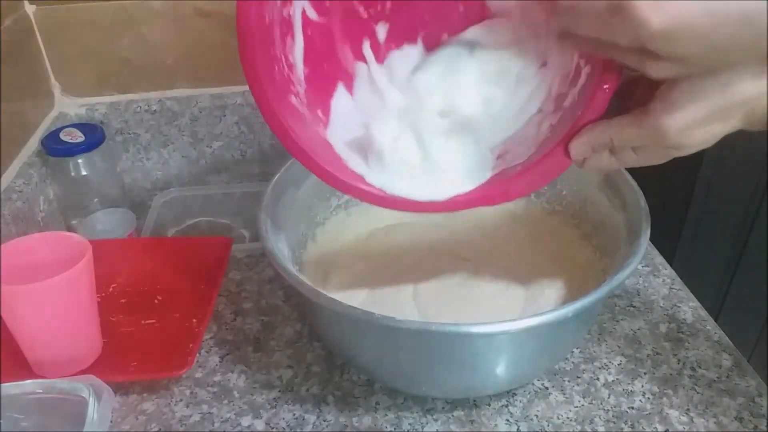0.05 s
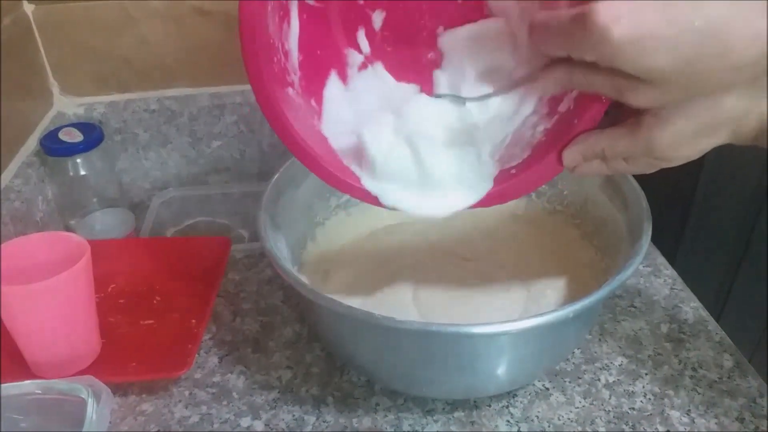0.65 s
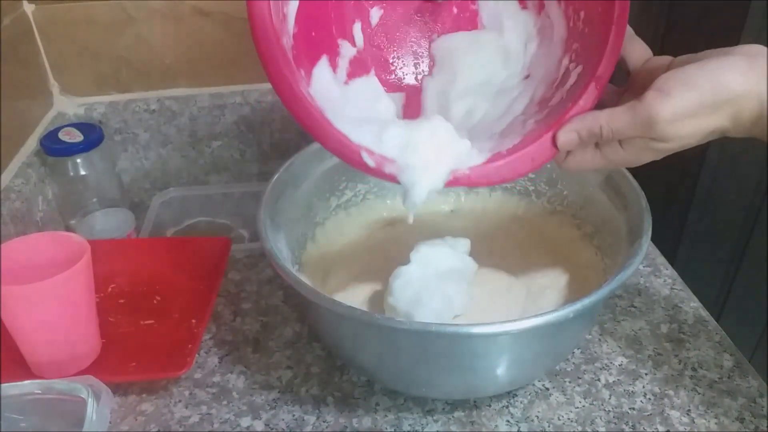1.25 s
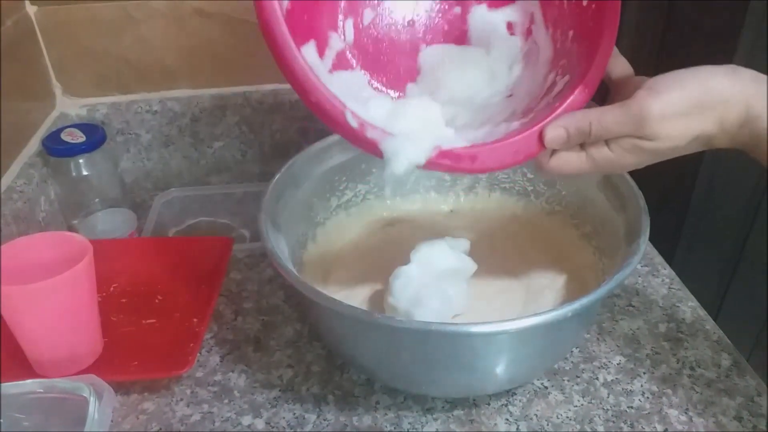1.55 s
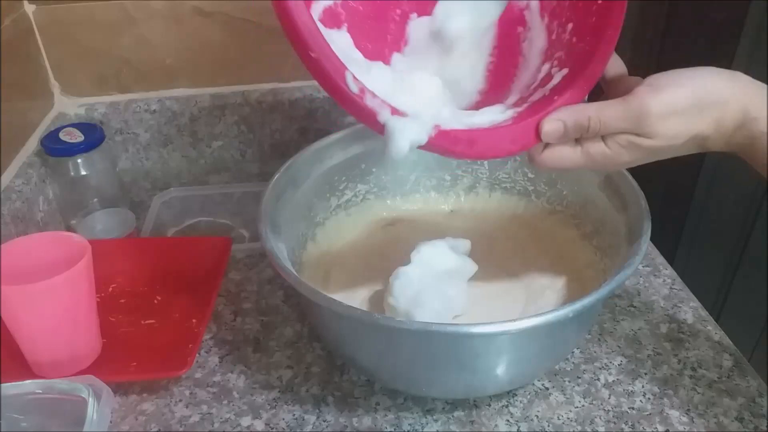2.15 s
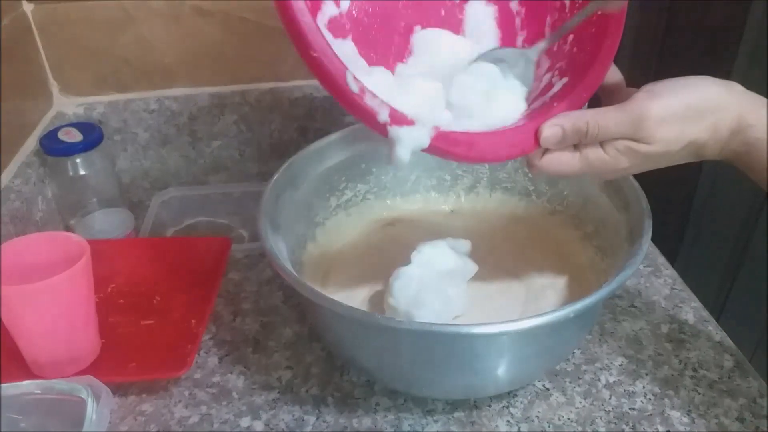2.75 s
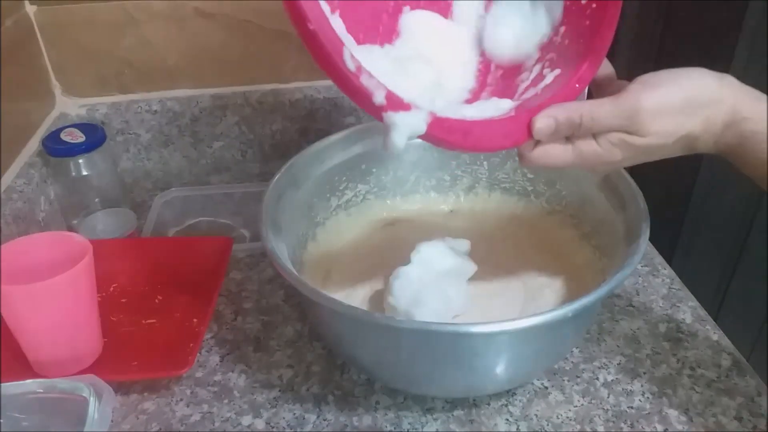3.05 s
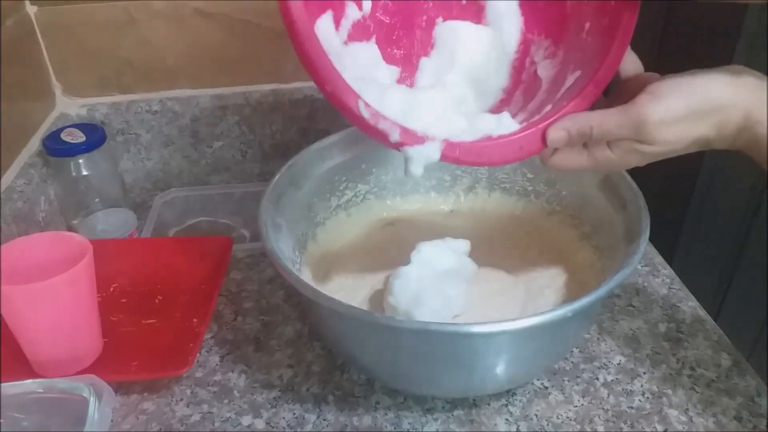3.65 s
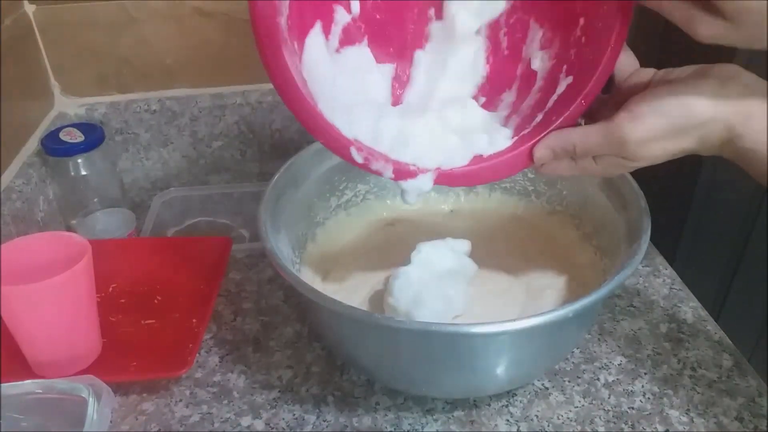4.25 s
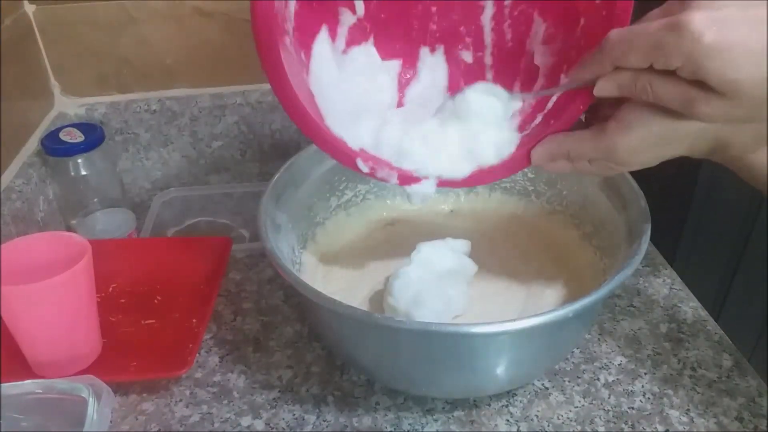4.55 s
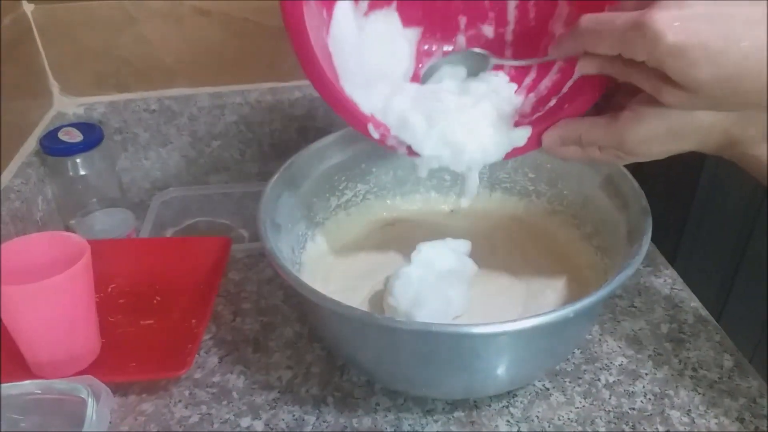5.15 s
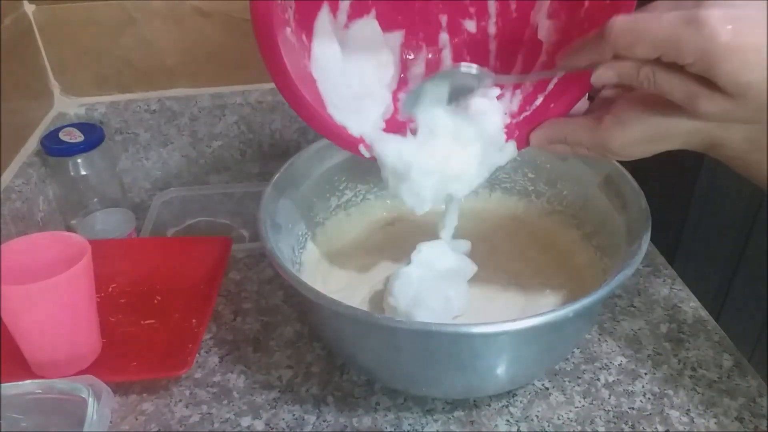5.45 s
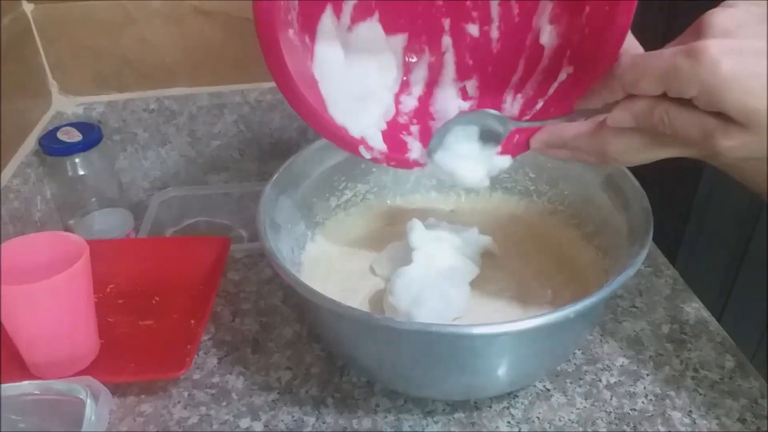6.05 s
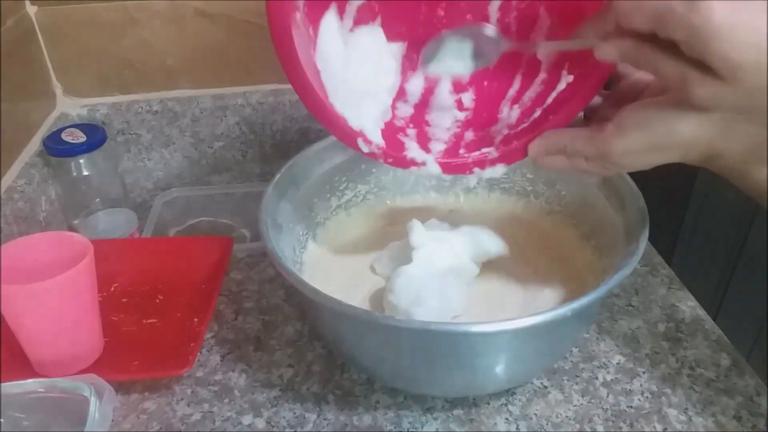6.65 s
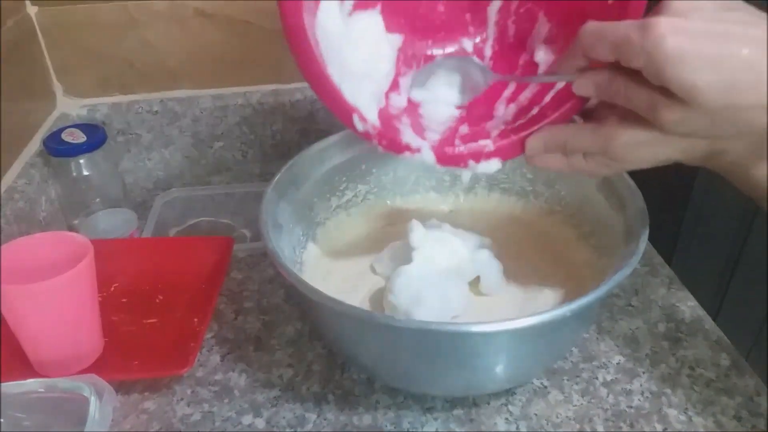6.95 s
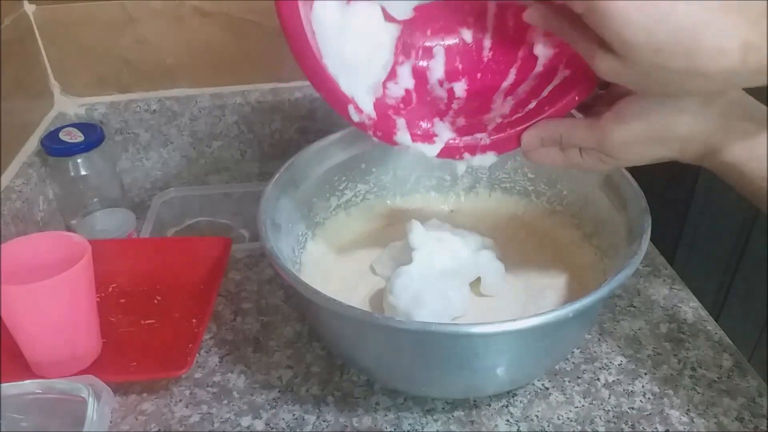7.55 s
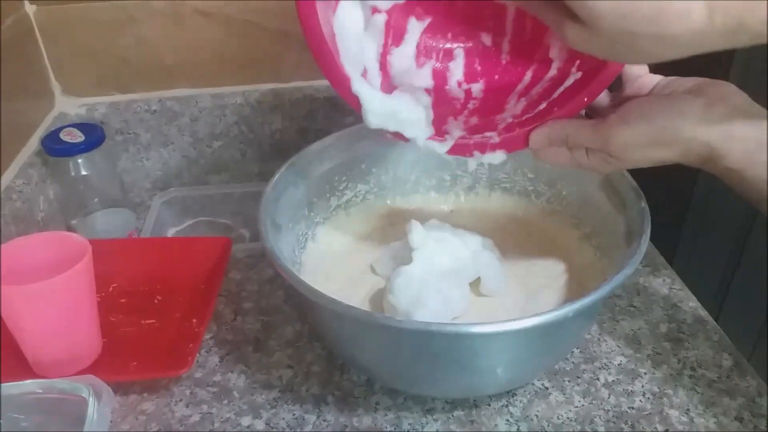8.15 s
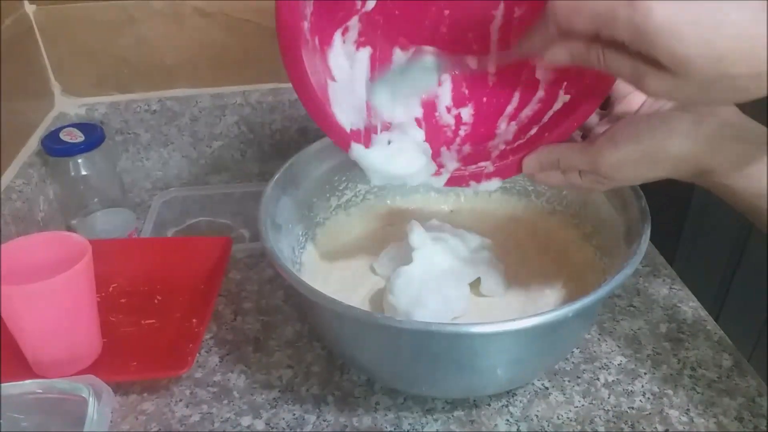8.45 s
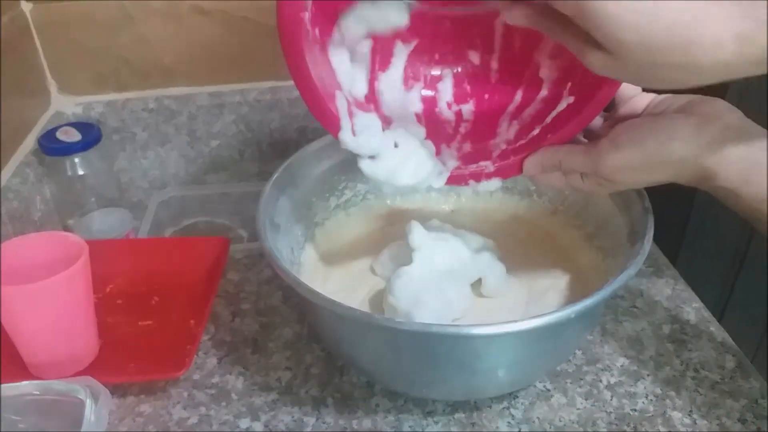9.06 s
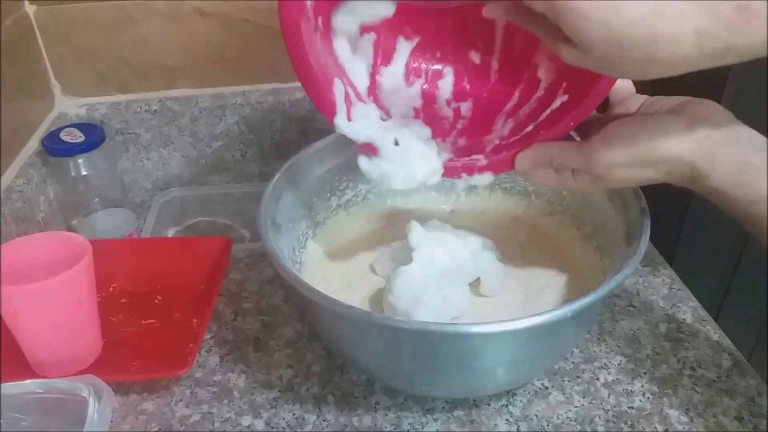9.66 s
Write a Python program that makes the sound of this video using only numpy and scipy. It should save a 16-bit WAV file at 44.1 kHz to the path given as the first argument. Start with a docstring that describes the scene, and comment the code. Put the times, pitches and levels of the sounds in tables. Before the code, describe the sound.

A steel spoon scoops whipped egg white from a plastic bowl, close to the microphone in a small tiled kitchen. Each stroke opens with a hollow, briefly ringing knock, followed by a short, softer scrape of fizzing, squelching foam and rubbed plastic. Knocks come right at the start and at about 0.5, 1.3, 2.4, 3.0, 3.7, 4.3, 5.0 and 5.7 seconds, the strongest at 0.5 and 4.3. The wet scraping swells around 4.4 and 5.1 seconds, where the edge catches with a sharp tick. More knocks land near 6.5, 6.8, 7.6, 8.1, 8.7, 9.1 and 9.6 seconds, with clusters of scratchy ticks and firmer rubbing between 7.6 and 8.4. Now and then the sliding spoon gives a very faint, thin, high ring. Quiet room air and a faint appliance hum continue underneath throughout.

```python
"""A small tiled kitchen, one microphone close to a plastic bowl held over a basin of batter.
A steel spoon scoops out whipped egg white. Each stroke starts with a knock that rings the bowl's
wall; then the spoon slides through the fizzing, squelching foam, rubbing and catching on the
plastic and now and then singing faintly. Behind it are room air and an appliance's faint hum."""
import sys
import numpy as np
from scipy import signal
from scipy.fft import rfft, irfft
from scipy.io import wavfile
from scipy.ndimage import uniform_filter1d

SR = 44100
rng = np.random.default_rng(int(sys.argv[2]) if len(sys.argv) > 2 else 0)


def store_pcm(level_fs):
    """Save levels as 16-bit WAV."""
    pcm = np.round(np.clip(level_fs, -1, 1) * 32767).astype(np.int16)
    wavfile.write(sys.argv[1], SR, np.atleast_2d(pcm).T)


N = 436149
TIME = np.arange(N) / SR


def from_db(db):
    """Decibels to gain."""
    return 10 ** (np.asarray(db) / 20)


def unit_rms(x):
    """Scale to rms 1."""
    return x / np.sqrt(np.mean(x ** 2) + 1e-20)


def at_hz(points, hz):
    """Read a table on a log-frequency axis."""
    table_hz, value = np.transpose(points)
    return np.interp(np.log(np.maximum(hz, 1)), np.log(table_hz), value)


def bump(hz, centre_hz, octaves):
    """Bell curve of height 1 on a log-frequency axis."""
    return np.exp(-.5 * (np.log2(hz / centre_hz) / octaves) ** 2)


def decay(t, t60):
    """Envelope that falls 60 dB in t60 seconds."""
    return np.exp(-np.log(1000) * t / t60)


def add(track, start_s, sound):
    """Mix a sound into the track at a time."""
    start = max(round(start_s * SR), 0)
    track[start:start + len(sound)] += sound[:N - start]


def band(x, low_hz, high_hz, order=2):
    """Butterworth band-pass."""
    sos = signal.butter(order, [low_hz, min(high_hz, .45 * SR)], "band", fs=SR, output="sos")
    return signal.sosfilt(sos, x)


def colour(x, spectrum):
    """Give a steady sound a spectrum; rms 1."""
    gain = from_db(at_hz(spectrum, np.fft.rfftfreq(len(x), 1 / SR)))
    return unit_rms(irfft(rfft(x) * gain, len(x)))


def flutter(length, depth_db, low_hz, high_hz):
    """A gain that wanders at random, at rates between low_hz and high_hz."""
    return from_db(depth_db * unit_rms(band(rng.standard_normal(length), low_hz, high_hz)))


def ring(x, modes):
    """Drive decaying modes, each given as (Hz, dB, t60 in seconds); rms 1."""
    out = 0
    for k, (hz, db, t60) in enumerate(modes):
        radius, angle = from_db(-60 / (t60 * SR)), 2 * np.pi * hz / SR
        mode = signal.lfilter([0, np.sin(angle)], [1, -2 * radius * np.cos(angle), radius ** 2], x)
        out = out + (-1) ** k * from_db(db) * mode
    return unit_rms(out)


# The still kitchen, all around the microphone. Each row: frequency in Hz, relative density in dB.
ROOM_AIR = [(30, -30.5), (55, 1.5), (100, 0.5), (160, -8), (350, -8.5), (550, -10), (900, -15.5),
            (1400, -9.5), (2000, -22), (3800, -25.5), (6000, -22), (10000, -22.5), (13000, -28.5),
            (16000, -30.5)]
# An appliance in the background. Each row: frequency in Hz, rms level in dB.
HUM_TONES = [(97, -72), (328, -88.5), (533, -82.5), (1410, -80)]

def room_tone(air_db=-66.0, waver=0.11):
    """Room air and an appliance's slightly wavering hum."""
    out = from_db(air_db) * colour(rng.standard_normal(N), ROOM_AIR)
    for hz, db in HUM_TONES:
        drift = np.interp(TIME, np.linspace(0, TIME[-1], num=60), rng.standard_normal(60))
        tone = np.sqrt(2) * np.sin(2 * np.pi * hz * TIME + drift)
        out += from_db(db) * (1 + waver * drift) * tone
    return out


# The bowl's thin wall under hard contact. Each row: frequency in Hz, relative density in dB.
WALL_SPECTRUM = [(100, -4.5), (200, -1.5), (600, 11), (800, -6), (1150, 3.5), (1500, -2.5), (2000, 2.5),
                 (2500, -5), (4000, -7.5), (5200, -9), (7500, -10), (10000, -15.5), (12500, -23),
                 (16000, -32)]
# The steel spoon's own ring. Each row: frequency in Hz, relative level in dB, t60 in seconds.
SPOON_MODES = [(4000, 2, 0.13), (3720, -3.5, 0.22), (5590, 6, 0.033), (6220, 4.5, 0.14), (6484, 2, 0.04),
               (8700, 6, 0.078), (9900, 1.5, 0.065), (9900, 0, 0.28), (15000, -11, 0.057)]

def wall_and_spoon(count=110, spread_db=14.5, wall_t60=0.085):
    """Bright answer of the spoon and the wall's many uneven upper modes to one click; energy 1."""
    wall_hz = np.geomspace(900, 12000, count) * (1 + .008 * rng.standard_normal(count))
    wall_db = at_hz(WALL_SPECTRUM, wall_hz) + 10 * np.log10(wall_hz / wall_hz[0])
    wall_db += spread_db * rng.uniform(-1, 1, count)
    ring_times = wall_t60 * rng.uniform(.8, 1.4, count)
    t = np.arange(SR * 3 // 5) / SR
    out = 0
    for hz, db, t60 in [*zip(wall_hz, wall_db, ring_times), *SPOON_MODES]:
        out = out + from_db(db) * np.sin(2 * np.pi * (hz * t + rng.random())) * decay(t, t60)
    return out / np.linalg.norm(out)


# Strokes through the foam, close to the microphone, each slowing as it goes.
# Each row: start in seconds, length in seconds, relative foam hiss in dB, relative rub in dB.
STROKE_EVENTS = [(0.0, .18, -39.5, -37.5), (0.515, 0.24, -53, -42.5), (1.312, .17, -56, -51.5),
                 (1.615, .14, -61.5, -56.5), (1.813, 0.22, -52, -49), (2.395, 0.38, -48.5, -49.5),
                 (3.04, 0.35, -55, -52), (3.763, .28, -45.5, -49.5), (4.314, .34, -44.5, -44.5),
                 (5.009, 0.385, -49, -44.5), (5.728, 0.36, -55.5, -50), (6.805, 0.415, -45.5, -41),
                 (7.594, 0.29, -44, -42.5), (8.1, 0.31, -49.5, -44.5), (8.683, 0.17, -53, -53),
                 (9.176, 0.23, -50, -49.5), (9.733, .17, -56, -54)]
# The spoon bears down and tears off a lump.
# Each row: peak time in seconds, rise in seconds, relative foam hiss in dB, relative rub in dB.
PUSH_EVENTS = [(0.14, 0.044, -42, -55), (0.597, 0.021, -40.5, -36), (0.795, 0.034, -51.5, -42.5),
               (1.325, 0.029, -69, -35), (1.415, 0.016, -49.5, -40.5), (1.455, 0.034, -51, -54),
               (1.711, 0.034, -42.5, -43), (1.93, 0.038, -49, -56.5), (2.44, 0.018, -60, -36),
               (2.615, 0.023, -47, -58), (2.771, 0.015, -51.5, -62), (3.08, 0.02, -52.5, -68),
               (3.235, .015, -52, -72), (3.8, 0.02, -48, -56), (3.908, 0.02, -40.5, -44.5),
               (4.023, 0.031, -46, -48.5), (4.355, 0.022, -39.5, -34), (4.423, 0.022, -31.5, -34.5),
               (5.086, 0.019, -34, -34.5), (5.14, 0.04, -42, -41.5), (5.247, 0.017, -57.5, -38.5),
               (5.764, 0.06, -45, -37.5), (5.995, 0.029, -47.5, -54), (6.87, 0.048, -40.5, -40),
               (7.62, 0.017, -54.5, -44), (7.695, 0.014, -42, -37), (8.121, 0.023, -34.5, -30.5),
               (8.402, .012, -37.5, -57), (8.715, 0.02, -65, -40.5), (9.31, 0.027, -56, -47.5),
               (9.783, 0.019, -49.5, -44)]

def spoon_pressure(edge_s=0.0083, fade_db_per_s=31.5, fall_over_rise=.85):
    """Gains of hiss and rub: every stroke sets in, fades and lifts off; pushes swell on top."""
    power = np.zeros((2, N))
    t = np.arange(SR) / SR
    for start, length, *levels in STROKE_EVENTS:
        attack = np.minimum(t / edge_s, 1)
        release = np.exp(-np.maximum(t - length, 0) / edge_s)
        stroke = attack * from_db(-fade_db_per_s * t) * release
        for track, db in zip(power, levels):
            add(track, start, (from_db(db) * stroke) ** 2)
    for peak, rise, *levels in PUSH_EVENTS:
        start = max(peak - .5, 0)
        past_peak = (start + t - peak) / rise
        push = np.exp(-np.where(past_peak < 0, past_peak ** 2, past_peak / fall_over_rise))
        for track, db in zip(power, levels):
            add(track, start, (from_db(db) * push) ** 2)
    return np.sqrt(power)


def slips(per_s, spread_db):
    """Random tiny clicks of uneven size; rms 1."""
    sizes = from_db(spread_db * np.minimum(rng.exponential(1, N), 4)) * rng.choice([-1, 1], N)
    return unit_rms(sizes * (rng.random(N) < per_s / SR))


# Tearing egg white, heard close up. Each row: frequency in Hz, relative density in dB.
FOAM_SPECTRUM = [(900, -33.5), (1700, -2), (2500, -0.5), (3800, 2), (5000, -2), (7000, -1.5), (10000, -7.5),
                 (12500, -14.5), (16000, -23.5)]

def foam_hiss(stick_slip, bright_ring, ring_db=-7.5):
    """Foam tears in a fine fizz that also rings wall and spoon."""
    fizz = colour(slips(per_s=12000, spread_db=-2.0) * stick_slip, FOAM_SPECTRUM)
    return fizz + from_db(ring_db) * unit_rms(signal.fftconvolve(fizz, bright_ring)[:N])


# Steel rubbing on plastic. Each row: frequency in Hz, relative density in dB.
RUB_SPECTRUM = [(100, -23), (200, -3.5), (450, 11.5), (640, 11), (800, -6.5), (1250, 0), (2000, -8),
                (2800, -17), (5000, -33.5)]
# The bowl and the air in it. Each row: frequency in Hz, relative level in dB, t60 in seconds.
BOWL_MODES = [(156, -12.5, 0.11), (184.8, 6, 0.096), (205, -6, 0.053), (266, 5.5, 0.46), (297.5, 3.5, 0.28),
              (321, -5, 0.25), (359.7, 4, 0.45), (406.6, -7.5, 0.33), (441, 9.5, 0.354), (452.5, 9.5, 0.19),
              (485.4, 0, 0.19), (510.6, -4, 0.36), (498, -3.5, .18), (556.6, 8, 0.32), (580, -0.5, 0.58),
              (629, 18, 0.11), (620, 6, 0.47), (720, -18.5, 0.28), (735, -17, 0.2), (808, 1, 0.42),
              (1027, -0.5, 0.05), (1050, -2, 0.053), (1192, -8, 0.12), (1262, 4.5, 0.2), (1261, -16, .17),
              (1460, -2, 0.15), (1625, -2, 0.14), (1870, -9, 0.15)]

def plastic_rub(stick_slip, bowl_db=-3.5, t60_factor=0.62):
    """Small slips drive the bowl's modes, which the pressing spoon damps."""
    friction = slips(per_s=1100, spread_db=3.0) * stick_slip
    damped = [(hz, db, t60 * t60_factor) for hz, db, t60 in BOWL_MODES]
    return colour(friction, RUB_SPECTRUM) + from_db(bowl_db) * ring(friction, damped)


def squelch(pops_per_s=14, ring_cycles=39.0, pockets=12):
    """Air pockets in the foam open at random and ring briefly, each at its own pitch; rms 1."""
    out = 0
    for hz in np.geomspace(900, 4200, pockets):
        pops = np.maximum(1 - rng.random(N) * SR / pops_per_s, 1e-18)  # rare clicks, sizes 0 to 1
        out = out + ring(pops, [(hz, 0, ring_cycles / hz)]) / np.sqrt(hz)
    return unit_rms(out)


def scrape(bright_ring, hiss_db=-4.5, rub_db=-6.0, squelch_db=-10.0):
    """The spoon grips and slides by turns, many times a second, through foam and over plastic."""
    hiss_gain, rub_gain = spoon_pressure()
    stick_slip = flutter(N, depth_db=1.84, low_hz=25, high_hz=180)
    foam = from_db(hiss_db) * foam_hiss(stick_slip, bright_ring)
    plastic = from_db(rub_db) * plastic_rub(stick_slip)
    sliding = hiss_gain * foam + rub_gain * (plastic + from_db(squelch_db) * squelch())
    # just before each knock, the spoon is off the wall
    lifted = np.any([(TIME > start - .02) & (TIME < start) for start, *_ in KNOCK_EVENTS], axis=0)
    return sliding * (1 - .8 * uniform_filter1d(lifted.astype(float), size=100))


def struck_bowl(t, low_hz, high_hz, grip, favour_db=8.0, spread_db=5.5, t60_factor=0.77):
    """Each bowl mode's frequency, and its ring after a blow that favours two resonances."""
    hz, db, t60 = np.transpose(BOWL_MODES)
    favoured = bump(hz, low_hz, octaves=.08) + .5 * bump(hz, high_hz, octaves=.15)
    weak_db = 12.5 * np.clip(np.log2(low_hz / hz), 0, .5)  # little is driven below the low resonance
    strength = from_db(db + favour_db * favoured - weak_db + spread_db * rng.standard_normal(len(hz)))
    pitch = hz * (1 + 0.0057 * rng.standard_normal(len(hz)))  # the hand flexes the bowl
    phase = 2 * np.pi * pitch[:, None] * t + 0.93 * rng.standard_normal((len(hz), 1))
    return hz, strength[:, None] * np.sin(phase) * decay(t, t60_factor * grip * t60[:, None])


# The bowl's thud, hollow, body, clack and tick. Each row: low edge in Hz, high edge in Hz.
BOWL_REGISTERS = [(135, 210), (258, 420), (420, 750), (750, 2150), (2150, 15000)]
# The tiled room ringing on behind a knock. Each row: frequency in Hz, t60 in seconds.
KITCHEN_T60 = [(120, 0.45), (500, 0.38), (1000, .42), (2500, 0.34), (6000, 0.38), (14000, .3)]

def knock(levels_db, low_hz, high_hz, grip, bright_ring,
          snap_db=7.5, crack_db=-2.0, bright_db=24.5, modes_db=-10.5, room_db=-6.5):
    """One blow: snap and crack, the wall's quick rattle, modes of bowl and spoon, the room's tail."""
    t = np.arange(len(bright_ring)) / SR
    mode_hz, modes = struck_bowl(t, low_hz, high_hz, grip)
    snap = from_db(snap_db) * band(rng.standard_normal(len(t)), 2600, 10000) * decay(t, .005)
    crack = from_db(crack_db) * decay(t, 0.0033)
    out = 0
    for (low, high), level_db in zip(BOWL_REGISTERS, levels_db):
        wall, room = (colour(rng.standard_normal(len(t)), WALL_SPECTRUM) for _ in range(2))
        # low down the bowl has few modes, so it rings clearly and rattles little
        rattle = from_db(np.interp(low, [400, 750], [-4.0, 0]))
        wall *= rattle * decay(t, grip * 0.21) + crack
        room_t60 = at_hz(KITCHEN_T60, np.sqrt(low * high))
        room *= rattle * from_db(room_db) * decay(t, room_t60) * (1 - decay(t, 0.022))
        clatter = wall + room + from_db(bright_db) * bright_ring + snap
        high_resonance = from_db(2.5) * band(clatter, high_hz / 1.09, high_hz * 1.004, order=1)
        low_resonance = from_db(5.5) * band(clatter, low_hz / 1.05, low_hz * 1.05, order=1)
        register = band(clatter + high_resonance + low_resonance, low, high, order=4)
        register += from_db(modes_db) * modes[(mode_hz >= low) & (mode_hz < high)].sum(axis=0)
        # a light bowl radiates almost nothing below its modes
        register = band(register, 0.99 * low, SR, order=4)
        onset_rms = np.std(register[:round(.04 * SR)])
        out = out + from_db(level_db) * register / onset_rms
    return out


def room_boom(level_db, hz=113.4, t60=0.72, rise_s=.09):
    """A blow also wakes the kitchen's low standing wave."""
    t = np.arange(SR) / SR
    return from_db(level_db) * np.sin(2 * np.pi * hz * t) * decay(t, t60) * (1 - decay(t, rise_s))


# Knocks close to the microphone; where the blow lands sets its colour, the grip sets its ring.
# Each row: start in seconds, then strength, thud, tick and room boom in dB, low and high
# resonance in Hz, grip as a factor on ring time.
KNOCK_EVENTS = [(0.002, -39.5, -72, -39.5, -59.5, 534, 2050, 0.91),
                (0.022, -39.5, -50.5, -59, -51, 462, 1990, 1),
                (0.5021, -25, -45, -29.5, -49.5, 594, 1030, 0.87),
                (0.6322, -38.5, -40, -37.5, -51, 218, 1710, 0.95),
                (0.992, -53.5, -66, -57.5, -75, 508, 990, 0.65),
                (1.275, -30, -58, -35, -49.5, 302, 1430, 0.62),
                (2.3832, -30, -34, -32, -51.5, 479, 2000, 0.85),
                (3.0157, -30.5, -37.5, -32.5, -66, 513, 1833, 0.5),
                (3.651, -29.5, -55.5, -33, -43, 311, 1450, 0.72),
                (4.3005, -24, -53, -30, -46.5, 372, 1092, 0.84),
                (4.983, -57.5, -46, -69, -68, 626, 1003, 0.52),
                (4.9931, -27.5, -55, -32, -46.5, 288, 1540, 0.61),
                (5.7087, -32, -45.5, -32.5, -46.5, 515, 1900, 0.95),
                (6.466, -35.5, -49, -32.5, -49.5, 890, 1445, 0.85),
                (6.492, -49.5, -44.5, -38, -62, 618, 2040, 0.71),
                (6.7795, -27.5, -36, -30.5, -47, 344, 2030, 0.86),
                (7.5675, -29.5, -39, -35, -67.5, 273, 1510, 0.7),
                (8.096, -27.5, -35, -34, -60.5, 274, 1570, 0.74),
                (8.6633, -37.5, -34.5, -35.5, -41.5, 236, 2093, 0.49),
                (9.1468, -36.5, -32.5, -38, -49, 283, 1930, 0.98),
                (9.184, -62, -50, -54, -62, 186, 1283, 0.92),
                (9.623, -32.5, -34, -35, -45.5, 274, 1940, 0.89),
                (9.68, -43, -37, -44, -57.5, 188, 1250, .8)]

def knocks(bright_ring, lift_db=7.0, hollow_trim_db=-4):
    """The spoon lands on the bowl, lifting the middle registers nearest its low resonance."""
    out = np.zeros(N)
    centres_hz = np.sqrt(np.prod(BOWL_REGISTERS[1:-1], axis=1))
    for start, strength_db, thud_db, tick_db, boom_db, low_hz, high_hz, grip in KNOCK_EVENTS:
        hollow_db, body_db, clack_db = strength_db + lift_db * bump(centres_hz, low_hz, octaves=0.37)
        levels_db = [thud_db, hollow_db + hollow_trim_db, body_db, clack_db, tick_db]
        add(out, start, knock(levels_db, low_hz, high_hz, grip, bright_ring))
        add(out, start, room_boom(boom_db))
    return out


# The spoon's edge catching on the wall. Each row: start in seconds, dry peak in dB, pitch in Hz.
CATCH_EVENTS = [(0.085, -33, 1783), (0.785, -43, 1000), (1.835, -33.5, 3660), (3.183, -36, 2670),
                (3.327, -40.5, 2780), (3.459, -47.5, 925), (4.948, -45, 1900), (5.087, -22, 3530),
                (5.24, -37.5, 1980), (5.269, -47, 1300), (5.374, -45.5, 1080), (5.861, -45, 2940),
                (6.062, -43.5, 980), (7.208, -40, 2000), (7.638, -25.5, 3000), (7.662, -27, 3540),
                (7.698, -26, 1590), (7.792, -27.5, 1390), (7.831, -30.5, 1630), (8.293, -40, 1460),
                (8.316, -30.5, 1280), (8.397, -30, 1620), (8.618, -51.5, 1287), (8.845, -41, 1270),
                (9.315, -36.5, 1260)]

def edge_catches(t60=0.068, rise_s=0.011, band_ratio=1.59, broad_db=-18.0):
    """The edge sticks and lets go in the wet foam: a short, ragged, pitched tick."""
    out, t = np.zeros(N), np.arange(SR // 10) / SR
    for start, peak_db, hz in CATCH_EVENTS:
        ragged = flutter(len(t), depth_db=4.0, low_hz=53, high_hz=500)
        burst = rng.standard_normal(len(t)) * ragged * decay(t, t60) * (1 - decay(t, rise_s))
        pitched = band(burst, hz / band_ratio, hz * band_ratio)
        tick = pitched + from_db(broad_db) * band(burst, 400, 6500)
        add(out, start, from_db(peak_db) * tick / np.abs(tick).max())
    return out


# The sliding spoon sings, faint even this close.
# Each row: start in seconds, end in seconds, pitch in Hz, level before the flicker in dB.
SING_EVENTS = [(0.69, 1.02, 9700, -79), (1.616, 2.016, 5650, -68), (1.88, 2.026, 6700, -73),
               (2.526, 2.803, 10000, -78), (2.563, 2.656, 6800, -63), (5.099, 5.38, 10100, -70),
               (5.83, 5.99, 6660, -70), (6.836, 7.24, 10300, -77), (6.962, 7.175, 5660, -70),
               (8.14, 8.423, 10400, -73), (8.697, 8.89, 10400, -76), (9.175, 9.423, 10450, -71)]

def spoon_singing(t60=.014, top_hz=14530.0, top_db=-11.5):
    """Friction keeps one mode of the spoon, and a very high one, ringing unevenly for a moment."""
    out = np.zeros(N)
    for start, end, hz, db in SING_EVENTS:
        length = round((end - start) * SR)
        friction = rng.standard_normal(N)[:length]
        tone = ring(friction, [(hz, 0, t60), (top_hz, top_db, t60)])
        add(out, start, from_db(db) * signal.windows.tukey(length) * tone)
    return out * flutter(N, depth_db=3.5, low_hz=22, high_hz=47)


def kitchen_reverb(x, wet_db=-6.0, t60=0.31):
    """Tiles and counter add a short diffuse tail to the small sounds."""
    t = np.arange(SR // 2) / SR
    tail = rng.standard_normal(len(t)) * decay(t, t60) * (1 - decay(t, 0.015))
    return x + from_db(wet_db) * signal.fftconvolve(x, tail / np.linalg.norm(tail))[:N]


def scene():
    """Knocks, scooping and the room, at one microphone."""
    bright_ring = wall_and_spoon()
    blows = knocks(bright_ring)
    scooping = scrape(bright_ring) + spoon_singing() + edge_catches()
    return (blows + kitchen_reverb(scooping) + room_tone())[None]


def record(dry):
    """The microphone's signal is cut steeply above 16 kHz."""
    return signal.sosfilt(signal.ellip(10, .1, 80, 16000, fs=SR, output="sos"), dry)


dry = scene()
out = record(dry)
store_pcm(out)
```